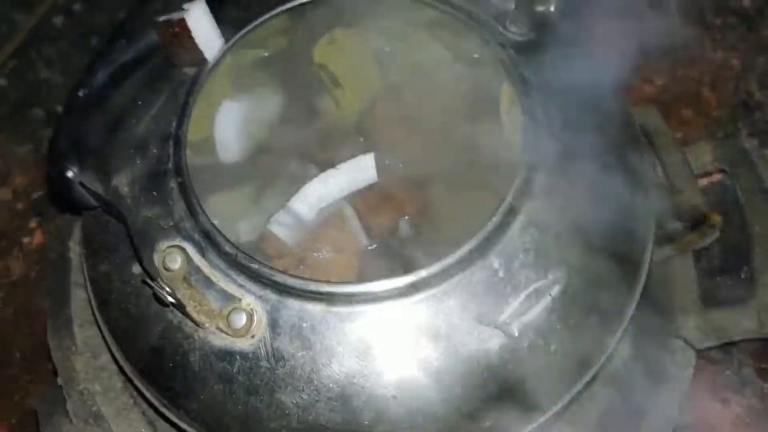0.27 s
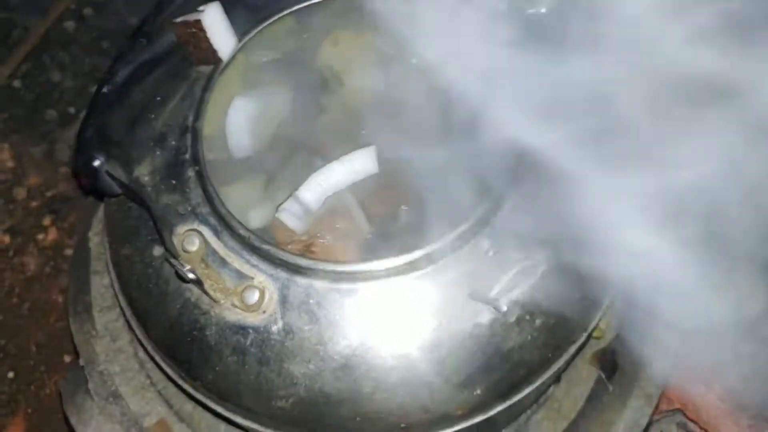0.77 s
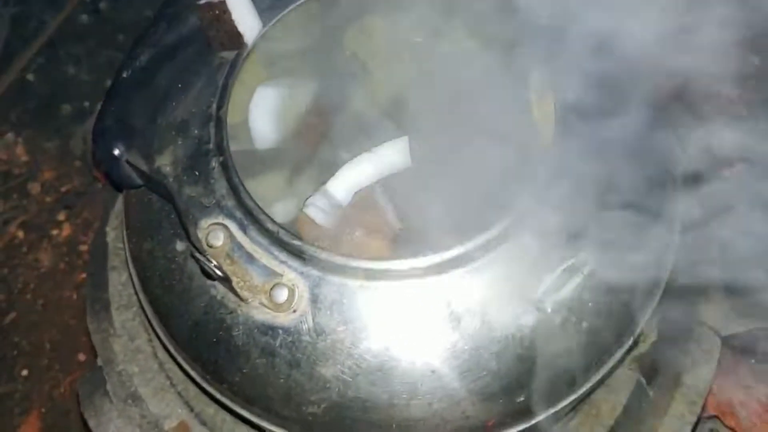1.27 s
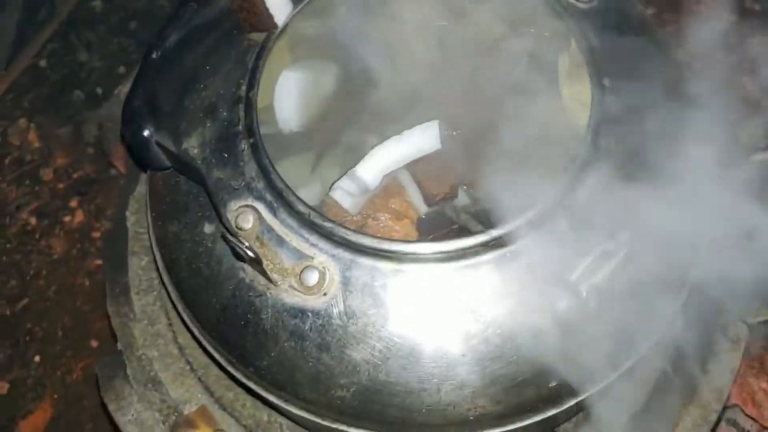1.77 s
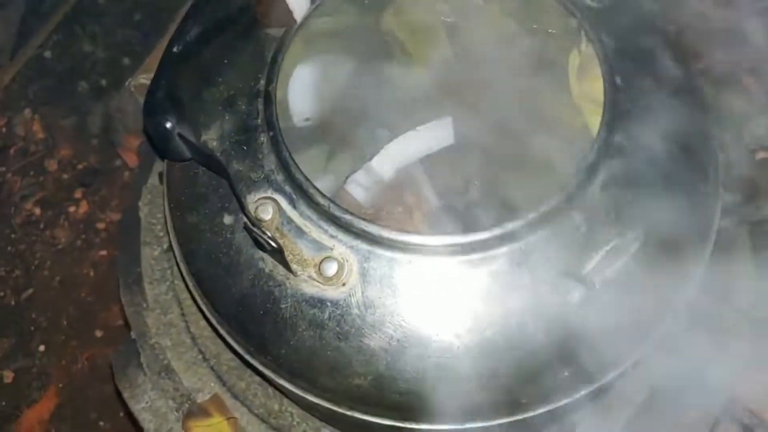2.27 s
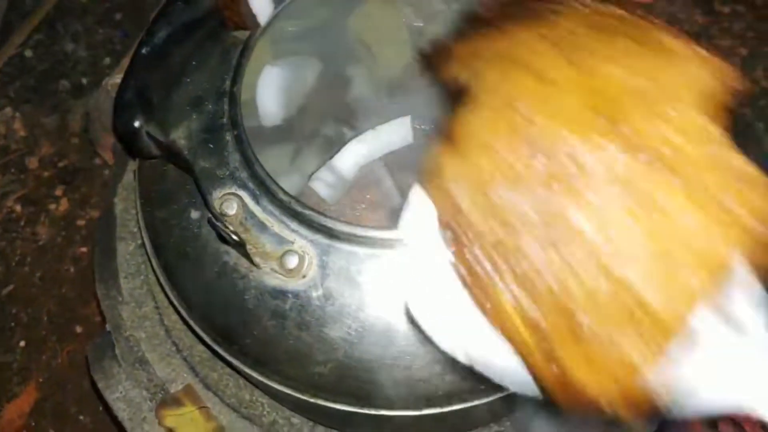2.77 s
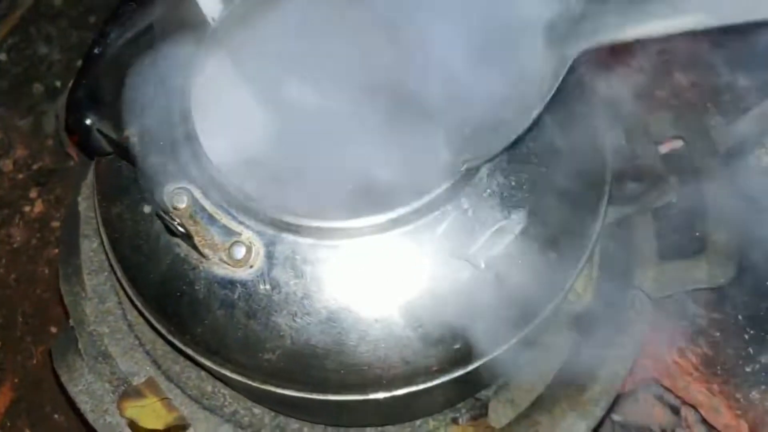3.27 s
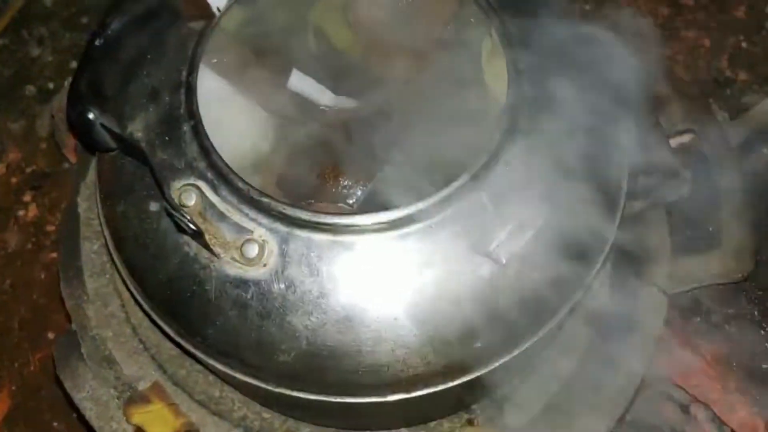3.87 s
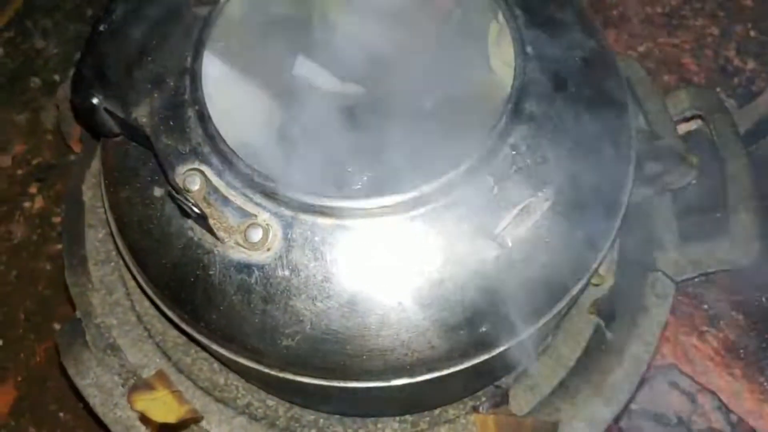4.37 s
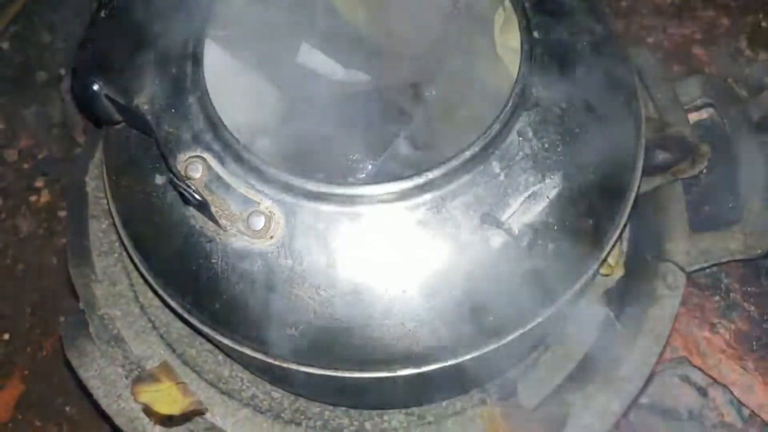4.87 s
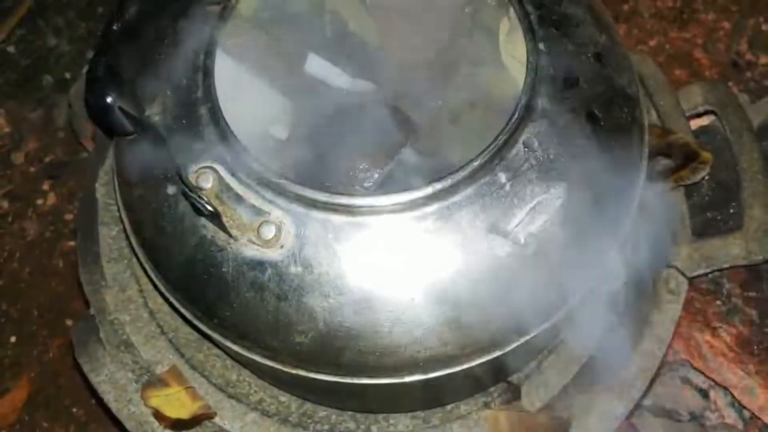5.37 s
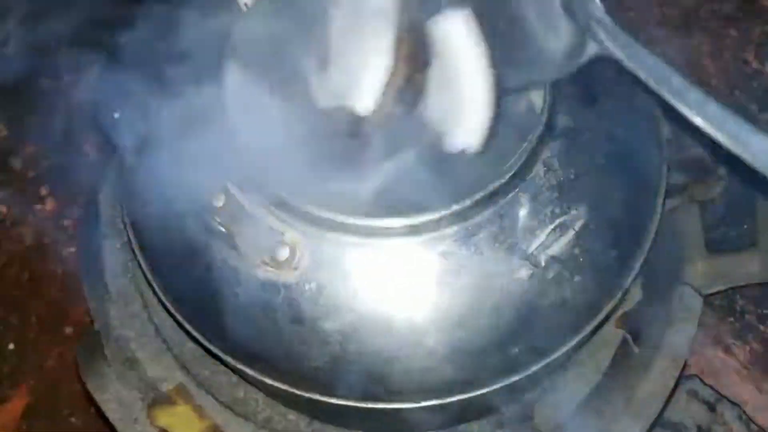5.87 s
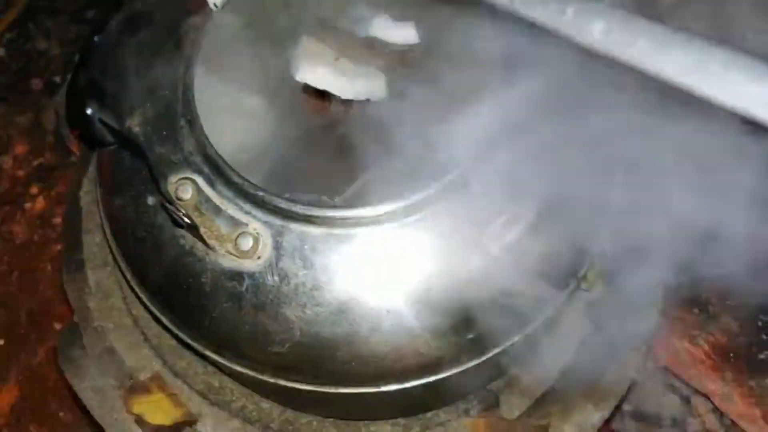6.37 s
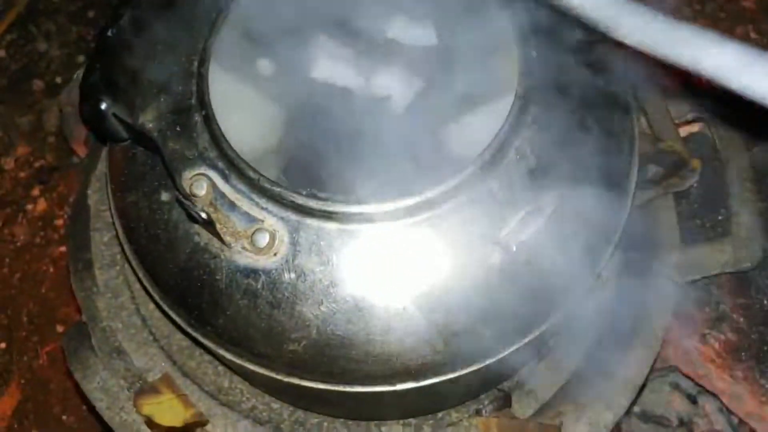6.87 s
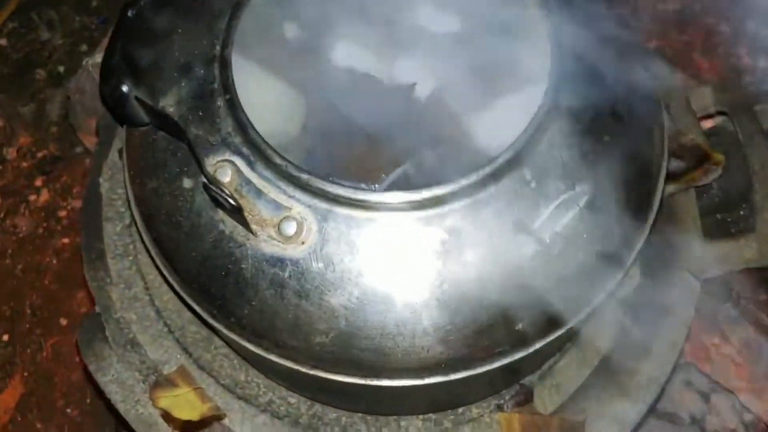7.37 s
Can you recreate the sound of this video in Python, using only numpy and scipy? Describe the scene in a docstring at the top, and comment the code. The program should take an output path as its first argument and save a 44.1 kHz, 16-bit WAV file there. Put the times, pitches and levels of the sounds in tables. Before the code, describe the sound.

Close by, a steel ladle rummages in a bowl of coconut chunks with bright scrapes and dull knocks, pauses, then strikes a kettle with short damped clinks as pieces slide off and splash. The same turn repeats more sparsely, and the rummaging starts again at the end. Behind it, a steady rasping cricket, faint insect hiss and quiet low fire and water noise in an open night yard.

```python
"""A steel kettle simmers outdoors at night while a cricket chirps and far insects hiss.
By turns, twice, a metal ladle rummages through chunks of coconut in a bowl to the right, and
clanks on the kettle's rim and tips chunks into the water; at the end it rummages again.
Blows are coloured noise plus ringing tones, scrapes are crowds of small blows, the cricket
is made of falling tones with echoes, and the night and a brief sizzle are coloured noise."""
import sys
import numpy as np
from scipy import signal
from scipy.fft import rfft, irfft, next_fast_len
from scipy.io import wavfile
from scipy.ndimage import uniform_filter1d

SR = 44100
rng = np.random.default_rng(int(sys.argv[2]) if len(sys.argv) > 2 else 0)


def unload_wav(signal):
    """Save mono or channel-first audio to the path in sys.argv[1] as 16-bit WAV at rate SR, clipped to [-1, 1]."""
    wavfile.write(
        sys.argv[1],
        SR,
        np.round(np.clip(np.atleast_2d(signal).T, -1, 1) * 32767).astype(np.int16),
    )


N = 336042
TIME = np.arange(N) / SR  # s
EDGE_HZ = 15500  # upper limit of the sound

# how alike the two microphone ports hear a pitch: (f/Hz, likeness/0-1)
PORT_LIKENESS = [(50, 0.3), (250, 1), (700, 0.86), (1500, 0.7), (3000, 0), (8000, 0), (15000, 0)]


def gain_of(db):
    """Turns decibels into amplitude."""
    return 10 ** (np.asarray(db) / 20)


def evened(x):
    """Scales a sound to an rms of 1."""
    return x / np.sqrt(np.mean(x ** 2) + 1e-20)


def read(points, hz):
    """Reads a table between its points, on a log-frequency axis."""
    f, value = np.transpose(points)
    return np.interp(np.log(hz + 1), np.log(f + 1), value)


def level(s, db):
    """Gives the amplitude along a dB curve, silent outside it."""
    return gain_of(np.interp(TIME, s, db, left=-150, right=-150))


def panned(side_db):
    """Gives left and right gains; a positive difference makes the left louder."""
    return gain_of(np.array([side_db, -side_db]).reshape(2, -1) / 2)


def add(mix, s, sound):
    """Mixes a sound in at time s, cut off at the end of the mix."""
    part = mix[:, max(round(s * SR), 0):][:, :sound.shape[1]]
    part += sound[:, :part.shape[1]]


def coloured(x, colour, lag_ms=0):
    """Filters two noises without pre-echo and makes them partly alike; the left may lag."""
    size = 2 * next_fast_len(x.shape[1])
    hz = abs(np.fft.fftfreq(size, 1 / SR))
    log_gain = np.log(gain_of(np.maximum(read(colour, hz), -90)))
    # minimum phase: the filter answers at once, never before its input
    shape = np.exp(np.conj(signal.hilbert(log_gain)))
    hz, shape = hz[:size // 2 + 1], shape[:size // 2 + 1]
    a, b = rfft(x, size) * shape
    same = np.clip(read(PORT_LIKENESS, hz), 0, 1)
    left = a * np.exp(-2j * np.pi * hz * lag_ms / 1000)
    right = same * a + np.sqrt(1 - same ** 2) * b
    return irfft([left, right], size)[:, :x.shape[1]]


def blow(colour, modes, crack_t60, tail_t60, tail_db, ring_db, lag_ms, length=1, lumps_db=7.0, size=11000):
    """One blow of energy near 1 per port: a crack, a dense tail, and modes that vary with the spot."""
    # how much louder the left port hears a blow: (f/Hz, difference/dB)
    port_balance = [(60, -3.5), (100, 0.0), (180, -3.5), (310, 0.5), (550, -3.5), (950, 1), (1650, 2.5),
                    (2860, 2), (4970, -2.5), (8640, -2.5), (15000, 3)]
    t = np.arange(size) / SR
    age = t / np.clip(length, .3, 2)  # length stretches every fade; t60 in s is for length 1
    crack = gain_of(-60 * age / crack_t60)
    tail = gain_of(tail_db - 60 * age / tail_t60)
    grid = np.linspace(0, 1, 120) ** 1.6 * EDGE_HZ
    # each spot favours its own resonances
    favoured = read(colour, grid) + lumps_db * rng.standard_normal(len(grid))
    noise = rng.standard_normal((2, size)) * (crack + tail)
    sound = evened(coloured(noise, np.transpose([grid, favoured]), lag_ms))

    ring = np.zeros((2, size))
    for hz, db, t60 in modes:
        spot = rng.choice([-1, 1]) * rng.uniform(0.75, 1.3)
        skew = rng.standard_normal()
        # phase between the ports: the left's lag plus a random part where they hear less alike
        apart = 2 * np.pi * hz * lag_ms / 1000 + 2 * skew * (1 - read(PORT_LIKENESS, hz))
        tone = np.sin(2 * np.pi * hz * t - np.array([[apart], [0]]))
        ring += spot * gain_of(db - 60 * age / t60) * tone
    ring *= np.minimum(t / .0005, 1)  # soft start

    both = sound + gain_of(ring_db) * evened(ring)
    heard = rfft(both) * panned(read(port_balance, np.fft.rfftfreq(size, 1 / SR)))
    return evened(irfft(heard, size)[:, :-500]) / np.sqrt(size)


def rattle(voice, strength, per_s, spread_db, count=10):
    """Many small contacts at random moments, wandering between spots that each sound different."""
    sizes = gain_of(spread_db * np.minimum(rng.exponential(1, N), 3))
    hits = rng.random(N) < per_s / SR
    clicks = evened(sizes * rng.choice([-1, 1], N) * hits) * strength
    # about 16 steps a second from spot to spot, with neighbours mixed
    spot = (16 * TIME + 2 * rng.random(N)).astype(int) % count
    return sum(signal.oaconvolve((clicks * (spot == k))[None], voice(), axes=1)[:, :N]
               for k in range(count))


def push(start, length, swell_db, fade_db_per_s, attack_db_per_s=1797):
    """One move of the ladle: a quick build-up, a hold that swells or sinks to full level, a release."""
    age = TIME - start
    held = swell_db * (np.clip(age / length, 0, 1) - 1)
    build_up = attack_db_per_s * np.minimum(age, 0)
    release = fade_db_per_s * np.maximum(age - length, 0)
    return gain_of(np.maximum(held + build_up - release, -150))


def pushes(moves):
    """Strength over time of the scraping, and of the load that it shifts."""
    return sum(gain_of([[scrape], [load]]) * push(*shape) for *shape, scrape, load in moves)


def night(low_db=-68, insects_db=-56.5, simmer_db=-77):
    """The low noise of fire and simmering water, tiny taps on the kettle, and far insects' even hiss."""
    # colours of the low noise and of the insects: (f/Hz, relative level per Hz/dB)
    low_colour = [(12, -35), (25, -6), (45, -1), (70, 1), (140, -13), (200, -10), (330, -19), (490, -6.5),
                  (650, -20), (860, -16.5), (1160, -20), (1500, -21.5), (2200, -47)]
    insect_colour = [(800, -42), (1300, -21.5), (1900, -8), (2250, -7.5), (2700, -10.5), (4000, -10.5),
                     (4900, -5.5), (5700, -11.5), (6600, -6.5), (7600, 0.5), (8800, -3), (10600, -17),
                     (13800, -24.5), (15400, -33)]
    low = evened(coloured(rng.standard_normal((2, N)), low_colour)) * gain_of(low_db)
    insects = evened(coloured(rng.standard_normal((2, N)), insect_colour)) * gain_of(insects_db)
    simmer = rattle(kettle_wall, gain_of(simmer_db), per_s=71, spread_db=7.5)
    return low + insects + simmer


def kettle_wall(modes=None):
    """The kettle's wall rings briefly, damped by the water."""
    # colour of a blow on the wall: (f/Hz, relative level per Hz/dB)
    wall_colour = [(410, -41), (700, -21.5), (884, -30.5), (990, -18), (1450, -18.5), (1870, -8),
                   (2220, -3.5), (2470, -18), (3350, -5.5), (3800, -19), (4940, -38), (8360, -120)]
    # ringing tones of the wall: (f/Hz, relative level/dB, time to fade by 60 dB/s)
    side_modes = [(2075, 0, 0.073), (2245, 6, .085), (2280, 0.5, .07), (2805, -13, 0.06)]
    if modes is None:
        modes = side_modes
    return blow(wall_colour, modes, crack_t60=.03, tail_t60=0.29, tail_db=-16.5, ring_db=2.0, lag_ms=.06)


def chirp_times(first_s=.054, count=36):
    """Each chirp follows the last after a nearly even gap, until the cricket stops."""
    # time from one chirp to the next, briefly hurried: (t/s, gap/s)
    gaps = [(.3, .2055), (.66, .189), (.85, .187), (1.04, .2035), (2, .2055), (7, .2033)]
    times = [first_s]
    while len(times) < count:
        times.append(times[-1] + np.interp(times[-1], *np.transpose(gaps)))
    return times


def cricket(top_hz=5090, end_hz=4590, stroke_s=0.024, cricket_db=-3, echo_db=-4, rasp_hz=140, size=7000):
    """Three wing strokes a chirp, each a rasping, falling tone; echoes from the yard beat against it."""
    # the cricket as heard by the moving microphone: (t/s, relative level/dB, left-right difference/dB)
    heard = [(0.1, -40, 7.5), (.3, -40.5, -4), (.55, -40.5, 12.5), (1.101, -34.5, 6.5), (1.3, -43.5, 6),
             (1.9, -37, 10), (2.5, -41, 9.5), (3.35, -41.5, 13.5), (4.35, -36.5, -1), (4.8, -45, 8),
             (6.2, -43, 4.5), (6.6, -41.5, 1), (7.2, -43, 8)]
    # wing strokes of one chirp: (t after its start/s, relative level/dB)
    strokes = [(0, -4), (0.038, 1), (0.075, 1.5)]
    # the nearest reflections before random shifts: (delay/s, left level/dB, right level/dB)
    yard = [(.008, -2, -4.5), (.015, -22.5, -11.5), (.023, -17, -5)]
    t, song = np.arange(size) / SR, np.zeros((2, N))
    along = np.clip(t / stroke_s, 0, 1)
    for s in chirp_times():
        # the paths shift at each chirp as the microphone sways
        paths = np.array(yard) + rng.standard_normal((len(yard), 3)) * [.0012, 2, 2]
        for after, db in strokes:
            pitch, force, slip = rng.standard_normal(3)
            hz = (top_hz + (end_hz - top_hz) * along) * (1 + .006 * pitch)
            rasp = 1 + .3 * np.sin(2 * np.pi * (rasp_hz * t + slip))
            swell = abs(np.sin(np.pi * along)) ** 0.26
            tone = np.sin(2 * np.pi * np.cumsum(hz) / SR)
            stroke = gain_of(db + force) * rasp * swell * tone
            for delay, left, right in [(0, 0, 0), *paths]:
                # strokes begin 5 ms ahead of their listed time
                add(song, s + after + delay - .005, gain_of([[left], [right]]) * stroke)

    # later, denser echoes: fading noise after the first 9 ms
    taps = rng.standard_normal((2, size)) * gain_of(-60 * t / .14) * (t > .009)
    echo = signal.oaconvolve(song, taps, axes=1)[:, :N]
    echo *= song.std() / echo.std(axis=1, keepdims=True)
    s, db, side = np.transpose(heard)
    loudness = gain_of(cricket_db + np.interp(TIME, s, db))
    return (song + gain_of(echo_db) * echo) * loudness * panned(np.interp(TIME, s, side))


def sizzle():
    """A short bright hiss on the right, made of noise, that dies away."""
    # loudness of the hiss before panning: (t/s, level/dB)
    loudness = [(0.307, -69), (0.31, -34.5), (0.335, -35), (0.37, -47.5), (0.45, -55.5), (0.58, -60)]
    # colour of the hiss: (f/Hz, relative level per Hz/dB)
    hiss_colour = [(300, -39.5), (3000, -23.5), (6000, -15), (8000, 3.5), (10500, -7.5), (13000, -20.5),
                   (15500, -22)]
    hiss = evened(coloured(rng.standard_normal((2, N)), hiss_colour))
    return hiss * level(*np.transpose(loudness)) * panned(side_db=-14)


def bowl_clink(length=1):
    """Thin steel struck by steel, damped by the chunks lying on it."""
    # colour of the clink: (f/Hz, relative level per Hz/dB)
    clink_colour = [(800, -50.5), (1400, -14), (1600, -16.5), (2200, -10), (2600, -17), (3200, -13),
                    (4200, -15), (5200, -15), (6400, -8), (7200, -4.5), (7800, 1.5), (8500, -3.5),
                    (9300, -13.5), (11000, -19), (15400, -55)]
    # ringing tones of the rim: (f/Hz, relative level/dB, time to fade by 60 dB at length 1/s)
    rim_modes = [(2153, -3.5, 0.069), (2640, 6, 0.019), (6840, -4, .16), (7060, -12, 0.15),
                 (7411, 0.5, 0.26), (7671, -15.5, .22), (8340, -8, 0.14), (8120, -6, 0.16),
                 (9440, -4.5, .09), (8710, -6.5, .15)]
    return blow(clink_colour, rim_modes, crack_t60=.03, tail_t60=.16, tail_db=-7, ring_db=-8,
                lag_ms=.28, length=length, lumps_db=4.8)


def bowl_thud(note=()):
    """The loaded bottom of the bowl, knocked by a chunk, with one extra note of the spot."""
    # colour of the thud: (f/Hz, relative level per Hz/dB)
    thud_colour = [(40, -58.5), (75, -33), (140, -32.5), (195, -20.5), (260, -35), (340, -19.5), (450, -12),
                   (530, -11.5), (630, -3.5), (900, 4.5), (1200, 1.5), (1530, -12), (2400, -11.5),
                   (4200, -32.5), (9000, -60)]
    # ringing tones of the bottom: (f/Hz, relative level/dB, time to fade by 60 dB/s)
    base_modes = [(618, -6.5, 0.19), (738, -8.5, .13), (862, 6, 0.062), (958.5, 4, 0.098),
                  (1240, -3, 0.063)]
    return blow(thud_colour, [*base_modes, *note], crack_t60=0.034, tail_t60=0.18, tail_db=-8,
                ring_db=-2.5, lag_ms=0.27)


def chunk_thud(low_hz=600, high_hz=1300, note_db=8, note_t60=0.09):
    """A tumbling chunk lands anywhere on the bottom and brings out the note of that spot."""
    hz = low_hz * (high_hz / low_hz) ** rng.random()
    return bowl_thud([(hz, note_db, note_t60)])


def bowl(clink_db=22.5, thud_db=24, note_db=14, note_t60=0.11, scrape_db=-5, tumble_db=-4,
         clink_side_db=-1.5, clink_length=1.1):
    """The ladle scrapes and knocks the chunks, which tumble on the bowl and settle after each knock."""
    # knocks in the bowl, bright or dull, and a faint rustle:
    # (t/s, relative clink level/dB, relative thud level/dB, note of the thud f/Hz)
    knocks = [(0.594, -9.5, -28, 977), (0.716, -4, -20, 1073), (0.736, -6.5, -19.5, 877),
              (0.761, -11.5, -21, 805), (0.838, -9.5, -19.5, 900), (0.866, -6.5, -16.5, 870),
              (0.939, -10, -31, 850), (1.081, -14, -20.5, 870), (1.728, -48, -24.5, 373),
              (1.747, -30, -20.5, 920), (1.764, -26, -8.5, 958), (1.905, -45, -31.5, 590),
              (3.947, -8, -25.5, 912), (4.034, -8, -15, 1117), (4.057, -9, -14, 940),
              (4.136, -6.5, -21.5, 835), (4.458, -12, -15.5, 2356), (4.46, -17.5, -20.5, 695),
              (4.566, -34, -26, 772), (6.682, -47, -45.5, 1020), (7.011, -46, -57, 2200),
              (7.448, -7, -14.5, 843), (7.5, -23, -18, 994), (7.536, -7, -19.5, 855)]
    # pushes through the chunks: (start t/s, length/s, swell over the push/dB,
    # dying away/dB per s, relative scrape level/dB, relative tumble level/dB)
    scoops = [(0.598, 0.014, 1, 256.5, -6, -20), (0.68, 0.095, 5, 347.5, -10.5, -20.5),
              (0.82, 0.066, 0.5, 197, -10, -17.5), (0.955, 0.022, 8, 182, -21, -24.5),
              (1.675, 0.12, 32.5, 399, -18, -17.5), (3.95, 0.033, 2.5, 297, -8.5, -26),
              (4.04, 0.058, 1, 146, -10, -19.5), (4.21, 0.12, -2, 292, -25, -31),
              (4.47, 0.0067, -16, 268.5, -19.5, -32.5), (4.685, 0.073, -12.5, 501, -57, -51),
              (7.45, 0.51, -2, 200, -11, -24)]
    settle_db, settle_db_per_s = -10.5, 349.5  # the clatter of chunks settling after a knock
    scrape, tumble = pushes(scoops)
    settling, t = np.zeros((2, N)), np.arange(SR // 4) / SR
    for s, clink, thud, _ in knocks:
        add(settling, s, gain_of(np.array([[clink], [thud]]) + settle_db - settle_db_per_s * t))

    scraping = np.hypot(scrape, settling[0])
    tumbling = np.hypot(tumble, settling[1])
    clinks = gain_of(scrape_db) * rattle(bowl_clink, scraping, per_s=380, spread_db=2.5)
    thuds = gain_of(tumble_db) * rattle(chunk_thud, tumbling, per_s=150, spread_db=0.0)
    for s, clink, thud, hz in knocks:
        add(clinks, s, gain_of(clink + clink_db) * bowl_clink(clink_length))
        add(thuds, s, gain_of(thud + thud_db) * bowl_thud([(hz, note_db, note_t60)]))
    return clinks * panned(clink_side_db) + thuds


def kettle_clink(length=1):
    """The ladle's edge strikes the kettle's rim, which rings."""
    # colour of the clink: (f/Hz, relative level per Hz/dB)
    clink_colour = [(1650, -37), (2800, -18.5), (3810, -23), (4030, -6.5), (4750, -14.5), (5210, -12.5),
                    (6550, -5.5), (8600, 0.5), (9640, -10), (10600, -17), (15400, -47)]
    # ringing tones of the rim: (f/Hz, relative level/dB, time to fade by 60 dB at length 1/s)
    rim_modes = [(4175, -29, 0.064), (4490, -15.5, 0.13), (5920, -19.5, 0.11), (6290, -16.5, 0.12),
                 (8100, 11, 0.063), (7900, 2.5, 0.083), (9040, -9.5, 0.14), (8100, -27, 0.038),
                 (9400, 3.5, 0.099)]
    return blow(clink_colour, rim_modes, crack_t60=0.02, tail_t60=.13, tail_db=-4, ring_db=-9,
                lag_ms=0.07, length=length)


def splash():
    """Water pushed aside inside the kettle: a fading burst of noise with no clear tones."""
    # colour of the splash: (f/Hz, relative level per Hz/dB)
    splash_colour = [(60, -54), (110, -27), (150, -8.5), (200, -9.5), (280, -11.5), (430, -1), (600, -15),
                     (820, -10.5), (1300, -25), (1800, -37)]
    return blow(splash_colour, [], crack_t60=0.075, tail_t60=0.4, tail_db=-22, ring_db=0, lag_ms=0.12)


def kettle(clink_db=24, wall_db=25, note_t60=0.076, scrape_db=-3, rub_db=-8, slosh_db=-5,
           clink_length=0.93, damped_length=0.89):
    """The ladle clanks on the rim and its load slides off; resting on the rim, it damps the ring."""
    # ladle on kettle: (t/s, relative clink level/dB, relative wall level/dB, wall note at that spot f/Hz)
    clanks = [(2.935, -15, -13, 2135), (2.963, -12, -16.5, 2140), (2.989, -10.5, -18.5, 2160),
              (3.072, -9, -31, 2090), (3.111, -18, -22.5, 2267), (3.454, -16.5, -52, 3320),
              (5.857, -7.5, -19, 2300), (6.051, -23, -51.5, 3030), (6.094, -37.5, -60, 2940),
              (6.424, -9.5, -20, 2860)]
    # chunks sliding along the ladle: (start t/s, length/s, swell over the slide/dB,
    # dying away/dB per s, relative scrape level/dB, relative slosh level/dB)
    slides = [(2.937, 0.059, 5, 380, -22.5, -33.5), (3.076, 0.084, 2, 404, -18.5, -36.5),
              (3.165, 0.05, 13, 856, -10, -28), (5.845, 0.038, -2.5, 498, -26, -35),
              (6.057, 0.11, -5, 694, -46, -59.5), (6.43, 0.048, -18, 602, -38.5, -44.5)]
    scrape, slosh = pushes(slides)
    out = gain_of(scrape_db) * rattle(lambda: kettle_clink(damped_length), scrape, per_s=1000, spread_db=6.0)
    out += gain_of(rub_db) * rattle(kettle_wall, scrape, per_s=710, spread_db=6.5)
    out += gain_of(slosh_db) * rattle(splash, slosh, per_s=130, spread_db=1.5)
    for s, clink, wall, hz in clanks:
        add(out, s, gain_of(clink + clink_db) * kettle_clink(clink_length))
        add(out, s, gain_of(wall + wall_db) * kettle_wall([(hz, 0, note_t60)]))
    return out


def plops(splash_db=16, bubble_db=-9, bubble_t60=0.07, bend_per_s=7.2):
    """Each chunk splashes and traps a bubble whose pitch rises as it surfaces."""
    # chunks landing in the water: (t/s, relative level/dB, starting pitch of the bubble f/Hz)
    landings = [(2.988, -21.5, 500), (3.029, -24.5, 400), (3.058, -20, 412), (3.107, -11.5, 429),
                (3.185, -25, 445), (3.228, -26.5, 415), (3.399, -42, 503), (5.856, -16.5, 446),
                (6.178, -30, 679), (6.422, -21.5, 523), (6.479, -27, 412)]
    out = np.zeros((2, N))
    for s, db, hz in landings:
        water = gain_of(splash_db) * splash()
        t = np.arange(water.shape[1]) / SR
        # bending the phase raises the pitch by twice bend_per_s
        tone = np.sin(2 * np.pi * hz * t * (1 + bend_per_s * t))
        bubble = gain_of(bubble_db - 60 * t / bubble_t60) * tone
        add(out, s, gain_of(db) * (water + bubble))
    return out


def scene():
    """All sources added up at the microphone."""
    return night() + cricket() + sizzle() + bowl() + kettle() + plops()


def record(dry):
    """A soft limit rounds the tallest peaks; then a filter removes what lies above the band."""
    limited = dry / (1 + (dry / .85) ** 6) ** (1 / 6)
    low_pass = signal.firwin(511, EDGE_HZ, window=("kaiser", 9), fs=SR)
    return signal.oaconvolve(limited, low_pass[None], "same")


dry = scene()
out = record(dry)
unload_wav(out)
```